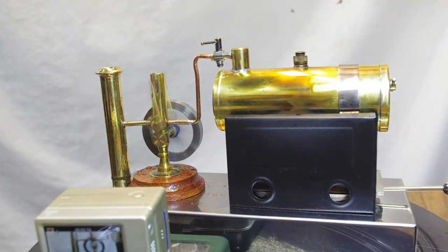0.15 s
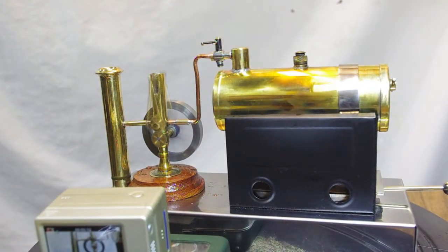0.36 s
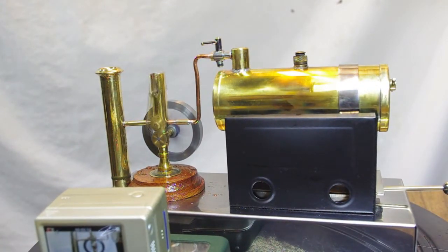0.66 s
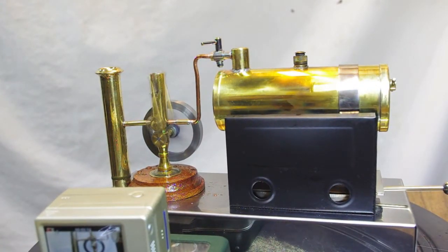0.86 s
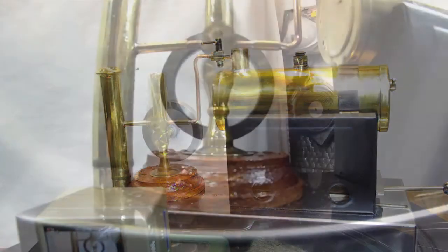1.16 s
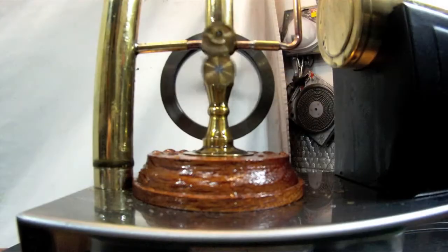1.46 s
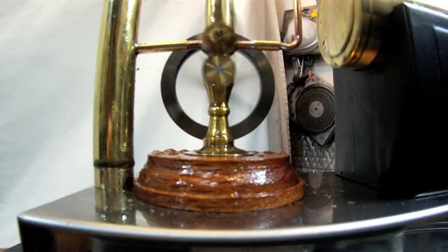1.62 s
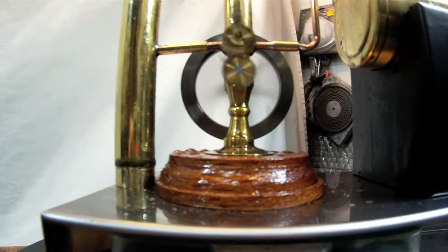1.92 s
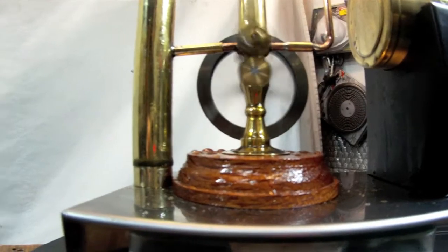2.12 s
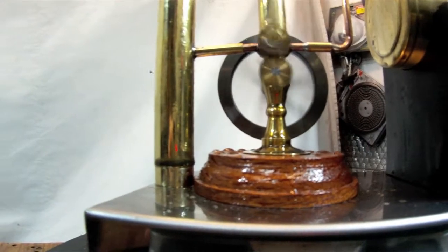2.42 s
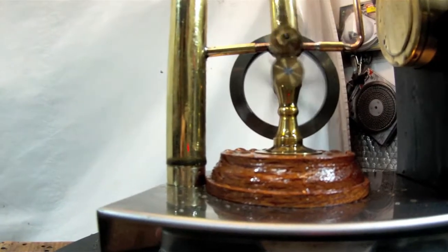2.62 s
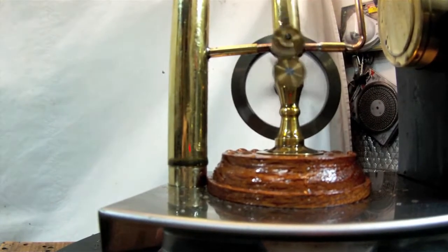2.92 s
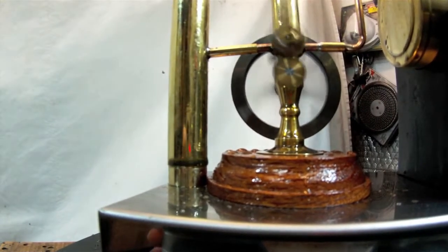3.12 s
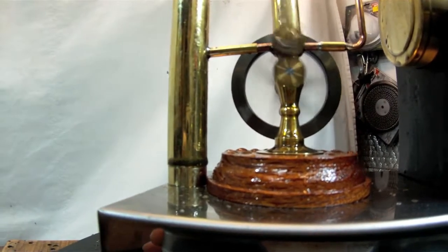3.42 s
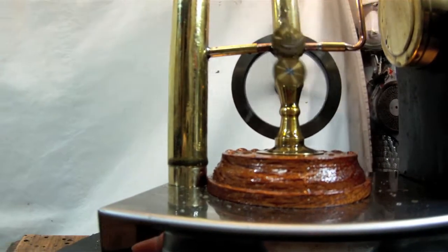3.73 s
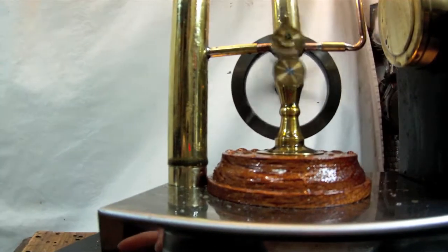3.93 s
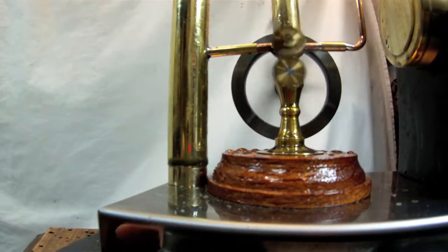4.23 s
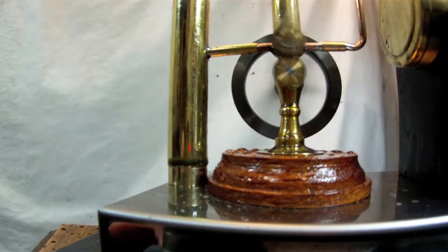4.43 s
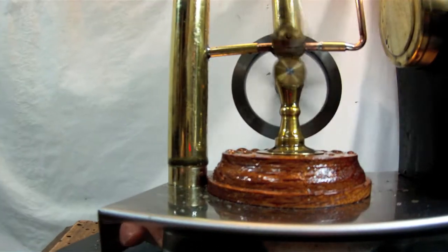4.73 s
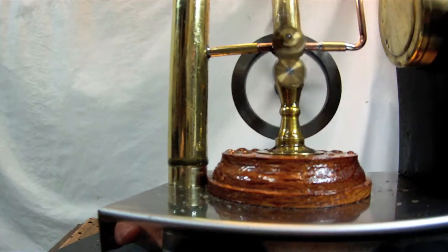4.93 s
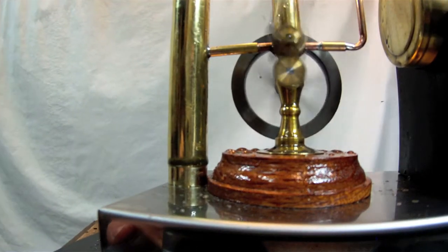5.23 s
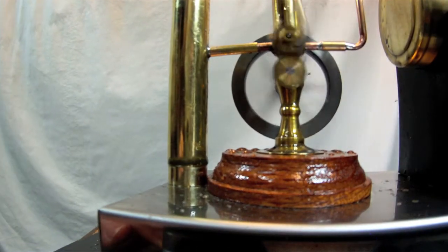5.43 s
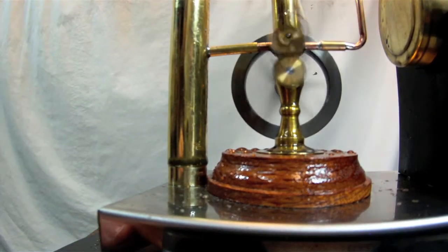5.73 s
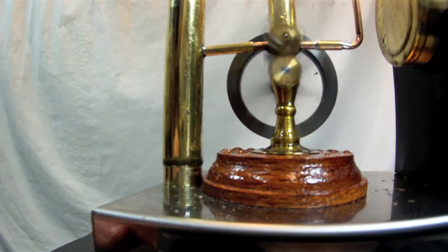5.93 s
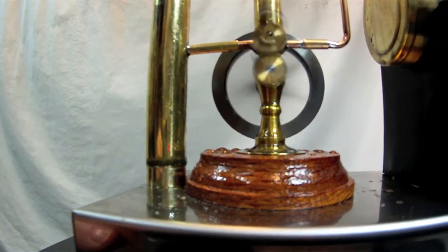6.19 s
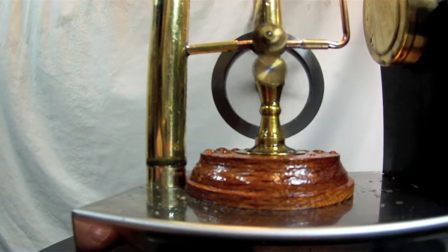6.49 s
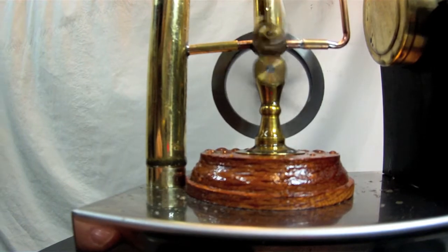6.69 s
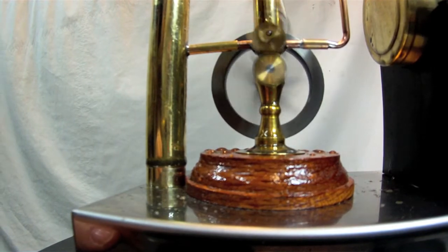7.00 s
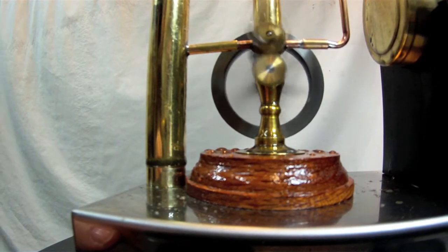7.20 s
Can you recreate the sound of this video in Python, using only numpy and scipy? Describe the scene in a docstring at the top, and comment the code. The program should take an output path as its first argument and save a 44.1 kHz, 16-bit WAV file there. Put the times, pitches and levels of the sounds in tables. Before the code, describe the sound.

A toy-sized steam engine is already running at 0 s and never stops, making nearly thirteen even chuffs a second, a fast fluttering purr. Until about 1 s it is heard across the bench: little bass, bright sputtering steam, crisp crank ticks, a short falling hoot on each puff and a second small spurt between. From 1 to 1.5 s this crossfades into a close hand-held view, fuller and hollower, with midrange chuffs, gentler wet hiss, light brass knocks and a thin port whistle. Soft steady noise and low handling rumble lie underneath, with dull bumps near 1.7 and 6.1 s. Speed crests very slightly around 3 s, then eases along with the level. From about 3.7 to 6 s the microphone moves round the engine: the whistle fades, resonances slide mostly upward, and the chuff grows shorter and more boxy while narrow cylinder ringing strengthens. The beat continues to the end, past 7.25 s.

```python
"""Model steam engine

One oscillating cylinder at about 13 turns/s: each turn a gated noise chuff with a hoot, a steam spit, crank knocks.
Looped and fresh noise rubs at the wet port face and rings the cylinder; steady soft noise lies under the close view.
A far view crossfades into a hand-held close view, which drifts through the resonances round the engine.
Turn-count rules give the pulse times; noise and tones under their envelopes are coloured by resonances."""
import sys
import numpy as np
from scipy import signal
from scipy.fft import rfft, irfft, next_fast_len
from scipy.io import wavfile
from scipy.ndimage import uniform_filter1d, map_coordinates

SR = 44100
rng = np.random.default_rng(int(sys.argv[2]) if len(sys.argv) > 2 else 0)


def wav_record(signal):
    """Record a signal, one row per channel, as 16-bit PCM in the file named by sys.argv[1]."""
    frames = np.transpose(np.atleast_2d(signal))
    bounded = np.clip(frames, -1, 1)
    # unit amplitude maps onto the largest positive 16-bit level
    quanta = np.round(bounded * 32767).astype(np.int16)
    wavfile.write(sys.argv[1], SR, quanta)


N = 324260


def amp(db):
    """Decibels to linear gain."""
    return 10 ** (np.asarray(db) / 20)


def unit(x):
    """x scaled to an rms of 1."""
    return x / np.sqrt(np.mean(x ** 2) + 1e-20)


def noise():
    """Fresh white noise."""
    return rng.standard_normal(N)


def curve(rows):
    """(t/s, value) rows interpolated to one value per sample."""
    return np.interp(np.arange(N) / SR, *np.transpose(rows))


def along(points, hz):
    """(f/Hz, value) points interpolated on a log axis."""
    f, v = np.transpose(points)
    return np.interp(np.log(hz + 1), np.log(f + 1), v)


def slope(points):
    """Gain over frequency of a (f/Hz, level/dB) spectrum."""
    return lambda hz: amp(along(points, hz))


def resonant(modes):
    """Gain over frequency of steep resonances, powers summed; each is 6 dB down at centre +/- width."""
    def gain(hz):
        power = sum(amp(db) ** 2 / (1 + ((hz - centre) / width) ** 2) ** 2
                    for centre, width, db in modes)
        return np.sqrt(power)
    return gain


def coloured(x, gain):
    """x through the minimum-phase filter with this gain over frequency."""
    size = next_fast_len(N + SR // 4, True) // 2 * 2
    log_gain = np.log(np.maximum(gain(np.fft.rfftfreq(size, 1 / SR)), 1e-6))
    cepstrum = irfft(log_gain, size)
    # folding the cepstrum makes the filter causal
    cepstrum[1:size // 2] *= 2
    cepstrum[size // 2 + 1:] = 0
    return irfft(rfft(x, size) * np.exp(rfft(cepstrum)), size)[:N]


def filtered(x, gain):
    """x with its spectrum multiplied by gain(hz); a real gain adds no delay."""
    size = next_fast_len(N + SR // 4, True)
    return irfft(rfft(x, size) * gain(np.fft.rfftfreq(size, 1 / SR)), size)[..., :N]


def moving_band(x, hz, width_hz):
    """x through a resonance with a moving centre: shift to 0 Hz, low-pass, shift back."""
    turn = np.exp(2j * np.pi * np.cumsum(hz) / SR)
    pole = np.exp(-np.pi * width_hz / SR)
    return 2 * np.real(turn * signal.lfilter([1 - pole], [1, -pole], x / turn))


def wobble(rate_hz):
    """Smooth random curve with rate_hz knots a second."""
    knots = rng.standard_normal(int(N * rate_hz / SR) + 4)
    return map_coordinates(knots, [np.arange(N) * rate_hz / SR])


def pulses(times, sizes, response):
    """The response, started at each time and scaled by its size."""
    index = np.clip(np.round(times * SR).astype(int) + SR, 0, None)
    return signal.fftconvolve(np.bincount(index, sizes, N + SR), response)[SR:SR + N]


def swell(rise, t60):
    """Envelope of one blow: builds up, then decays exponentially (s)."""
    t = np.arange(SR // 4) / SR
    return (1 - np.exp(-(t / rise) ** 2)) * amp(-60 * t / t60)


def stroke(rise, t60, length, shut_s=0.0064, tail_db=-5):
    """Envelope of one exhaust stroke: pressure builds and sinks; port shuts, leaving a tail of reflections."""
    t = np.arange(SR // 4) / SR
    shut = (1 + np.tanh((t - length) / shut_s)) / 2
    return swell(rise, t60) * amp(tail_db * shut)


def echoes(envelope, band, count=8):
    """Dense reflections: noise forced in turn to the band's spectrum and to the envelope."""
    x = envelope * rng.standard_normal(len(envelope))
    gain = band(np.fft.rfftfreq(len(x), 1 / SR))
    wanted = np.abs(uniform_filter1d(envelope ** 2, size=500))
    for _ in range(count):
        x = irfft(gain * np.exp(1j * np.angle(rfft(x))), len(x))
        x *= np.sqrt(wanted / (np.abs(uniform_filter1d(x ** 2, size=500)) + 1e-14))
    return x * np.sqrt(np.mean(gain ** 2) / np.sum(x ** 2))


def gated(times, sizes, envelope):
    """Fresh noise under the envelope of every blow."""
    power = np.abs(pulses(times, sizes ** 2, envelope ** 2))
    return unit(noise() * np.sqrt(power))


def scraped(times, sizes, envelope, repeats):
    """Noise each turn: part retraces the same marks in the metal, the rest is new."""
    share = lambda hz: np.clip(along(repeats, hz), 0, 1)
    marks = unit(pulses(times, sizes, echoes(envelope, np.ones_like)))
    same = filtered(marks, lambda hz: np.sqrt(share(hz)))
    fresh = filtered(gated(times, sizes, envelope), lambda hz: np.sqrt(1 - share(hz)))
    return same + fresh


def chirps(times, sizes, hz, envelope):
    """One gliding tone per turn; hz(t) is its pitch."""
    t = np.arange(len(envelope)) / SR
    tone = np.sin(2 * np.pi * np.cumsum(hz(t)) / SR)
    return unit(pulses(times, sizes, envelope * tone))


def steady_turns(t, speed_hz=12.751, dead_centre_s=0.0679):
    """Far view: turns made at constant speed."""
    return speed_hz * (t - dead_centre_s)


def cresting_turns(t, peak_s=3.0166, peak_hz=13.03, change_hz_per_s=0.1122):
    """Close view: turns made while speed climbs evenly to a peak, then falls evenly."""
    since = t - peak_s
    return since * (peak_hz - change_hz_per_s * np.abs(since) / 2)


def strokes(turns, port_lead_s=0.006, scatter_db=-0.65):
    """One exhaust per whole turn, opening before dead centre, sizes scattered: (times, sizes)."""
    t = np.linspace(-.1, N / SR + .1, 1000)
    made = turns(t)
    whole = np.arange(np.ceil(made[0]), made[-1])
    times = np.interp(whole, made, t) - port_lead_s
    return times, amp(scatter_db * rng.standard_normal(len(times)))


# chuff at far, near, beside, behind: level/dB, rise/s, t60/s, bark rise/s, bark t60/s,
# port open/s, lead on the steam/s, bass/dB re body
CHUFF_ROWS = [(-27.5, 0.0026, 0.28, 0.0012, 0.97, 0.061, -0.003, 2.5),
              (-25, 0.0057, 0.32, 0.0057, 0.38, 0.057, .005, 1),
              (-26.5, 0.0095, 0.363, 0.019, 0.45, 0.053, .004, 0.5),
              (-25, 0.012, 0.24, 0.028, 0.38, 0.044, .005, -1.5)]
# turbulence, new at every turn: f/Hz, power share 0-1
TURBULENCE_SHARE = [(150, 0), (600, 0.07), (1100, 0.14), (1800, 0.01), (2600, 0.34), (4000, 0.39)]


def chuff(times, sizes, modes, db, rise, t60, bark_rise, bark_t60, length, lead, boom_db,
          boom_hz=440, bark_hz=800, boom_t60=0.53):
    """One pressure pulse repeated every turn plus fresh turbulence rings the resonances; the port gates all but the bass."""
    above = lambda hz, edge: hz ** 12 / (hz ** 12 + edge ** 12)
    share = lambda hz: np.clip(along(TURBULENCE_SHARE, hz), 0, 1)
    boom_band = lambda hz: np.sqrt(1 - above(hz, boom_hz))
    body_band = lambda hz: np.sqrt(np.abs(above(hz, boom_hz) - above(hz, bark_hz)))
    bark_band = lambda hz: np.sqrt(above(hz, bark_hz))
    boom = amp(boom_db) * echoes(swell(0.012, boom_t60), boom_band)
    body = echoes(stroke(rise, t60, length), body_band)
    # from the side the bark builds late, by way of the firebox wall
    bark_envelope = stroke(bark_rise, bark_t60, length)
    bark = echoes(bark_envelope, bark_band)
    repeated = unit(pulses(times - lead, sizes, boom + body + bark))
    pulse = filtered(repeated, lambda hz: np.sqrt(1 - share(hz)))
    rush = filtered(gated(times - lead, sizes, bark_envelope), lambda hz: np.sqrt(share(hz)))
    return amp(db) * unit(coloured(pulse + rush, resonant(modes)))


# resonances between engine and firebox: t/s, lower f/Hz, its gain (linear, signed), upper f/Hz, its gain
GLIDE_ROWS = [(3.8, 700, 0.19, 1020, -0.49), (4.4, 730, 0.74, 1030, -0.88), (4.9, 774, 0.61, 1060, 0.48),
              (5.2, 800, 0.38, 1170, 0.33), (5.7, 795, 0, 1160, -0.5)]


def passing(x):
    """Two resonances drift, mostly upwards, as the microphone moves round the engine."""
    rows = np.array(GLIDE_ROWS)
    low_hz, low_gain, high_hz, high_gain = (curve(rows[:, [0, k]]) for k in range(1, 5))
    low = low_gain * moving_band(x, low_hz, width_hz=42)
    high = high_gain * moving_band(x, high_hz, width_hz=79)
    return x + low + high


# exhaust pipe at far, near, behind: level/dB, final f/Hz, start above it/Hz, fall/s, t60/s, delay/s
HOOT_ROWS = [(-30, 497, 214, 0.01014, 0.15, 0.00251), (-27, 476, 303, 0.01092, 0.072, 0.00072),
             (-29, 548, 126.3, 0.0079, 0.064, 0.00502)]
# reflections at the same places, one list each: delay/s, level/dB re direct
HOOT_WALLS = [
    [(.01968, -4.5), (.02773, -6), (.05035, -6)],
    [(.01716, -0.5), (.03152, -1.5), (.04807, -9)],
    [(.0285, -10)],
]


def hoot(times, sizes, db, hz, drop_hz, fall, t60, delay, walls, rise=.002):
    """Pipe tone at each chuff, falling as the pressure is spent; discrete reflections follow."""
    pitch = lambda t: hz + drop_hz * np.exp(-t / fall)
    tone = chirps(times + delay, sizes, pitch, stroke(rise, t60, 0.095))
    reflect = lambda f: 1 + sum(amp(loss) * np.exp(-2j * np.pi * f * late) for late, loss in walls)
    return amp(db) * unit(filtered(tone, reflect))


def pop(times, sizes, db=-39.5, hz=600, drop_hz=900, fall_s=.003):
    """Dry falling chirp as the port cracks open."""
    pitch = lambda t: hz + drop_hz * np.exp(-t / fall_s)
    return amp(db) * chirps(times + .0065, sizes, pitch, swell(rise=.0006, t60=0.036))


def spray(ragged_db, rate_hz=1100):
    """Wet steam sputters: a random gain flickers as droplets pass."""
    return unit(amp(ragged_db * wobble(rate_hz)))


# play in crank pin and pivot: t/s after the exhaust opens, far level/dB, close level/dB (both relative)
KNOCK_ROWS = [(.0045, -15, -1.5), (.0087, 1.5, 4), (0.0126, 0, -1.5), (.018, -7, -5.5), (0.022, -7, -5.5),
              (.028, -8, -7.5), (.049, -9, -10)]


def knocks(times, column, t60, jitter_s=.0002):
    """The crank takes up its play at nearly fixed delays each turn, never equally hard."""
    rows = np.array(KNOCK_ROWS)
    delay, db = rows[:, 0], rows[:, column]
    when = times[:, None] + delay + jitter_s * rng.standard_normal((len(times), len(delay)))
    sizes = amp(db + rng.uniform(-2, 2, when.shape))
    click = swell(.00005, t60) * rng.standard_normal(SR // 4)
    return unit(pulses(when.ravel(), sizes.ravel(), click))


def inlet_whistle(times, sizes, hz=1690, drop_hz=170, fill_s=0.0414, db=-37.0):
    """The inlet whistles, its pitch sinking as the cylinder fills."""
    pitch = lambda t: hz - drop_hz * np.minimum(t / fill_s, 1) ** 4
    return amp(db) * chirps(times + .041, sizes, pitch, stroke(.012, 0.21, fill_s))


def rubbing(times, repeats):
    """The cylinder slides on its wet port face without pause; each turn fades into the next."""
    period = np.mean(np.diff(times))
    envelope = np.sin(np.linspace(0, np.pi, int(2 * period * SR)))
    starts = np.r_[times[0] - period, times] - period / 2
    return scraped(starts, np.ones(len(starts)), envelope, repeats)


def leak_dip(times, depth, lead=0.0167, length=0.0051):
    """Gain of the leaks: a brief dip each turn shortly before the exhaust opens."""
    t = np.arange(SR // 16) / SR
    dip = np.sin(np.pi * np.minimum(t / length, 1)) ** 2
    return 1 - np.clip(depth, 0, 1) * pulses(times - lead - length / 2, np.ones(len(times)), dip)


# part of hiss and scrape that is the same every turn, close: f/Hz, power share 0-1
CLOSE_REPEATS = [(1700, .86), (2500, .68), (4000, .55), (8000, .55), (10000, .68)]
# cylinder bands: f/Hz, width/Hz, level/dB (relative)
CYLINDER_MODES = [(1588, 100, 0.5), (1680, 93, -1.5)]


def singing(times, db):
    """The rubbing keeps the cylinder ringing in narrow bands."""
    return amp(db) * unit(coloured(rubbing(times, CLOSE_REPEATS), resonant(CYLINDER_MODES)))


def bench(x, wet_db, t60):
    """Boiler, firebox and plate throw back short reflections that comb the hiss."""
    tail = swell(0.00052, t60) * rng.standard_normal(SR // 4)
    tail /= np.linalg.norm(tail)
    return unit(x + amp(wet_db) * signal.fftconvolve(x, tail)[:N])


def thump(times, sizes, hz, delay, length):
    """The rocking cylinder pushes the bench once a turn: a short tone burst."""
    t = np.arange(-SR // 16, SR // 16) / SR
    push = np.sin(2 * np.pi * hz * t) * np.exp(-(t / length) ** 2)
    return unit(pulses(times + delay + t[0], sizes, push))


# exhaust pipe, firebox and bench from afar: f/Hz, width/Hz, level/dB (relative)
FAR_MODES = [(258, 10, -19.5), (320.4, 8.6, -10.5), (499, 12, -2.5), (556, 86, -5), (696, 37, -8),
             (876, 140, -12), (980, 120, -16), (1330, 150, -16), (1655, 58, -10), (2460, 370, -17)]
# part of hiss and scrape that is the same every turn: f/Hz, power share 0-1
FAR_REPEATS = [(1700, .88), (2500, .68), (4000, .52), (8000, .25)]
# filter gains for spit with ticks, and for leak: f/Hz, level/dB (relative)
FAR_SPIT = [(1180, -42), (2000, -6), (2520, -8.5), (3040, -9), (3870, -2.5), (5500, -4.5), (6140, 1),
            (8220, -6.5), (12700, -15), (14600, -36), (15500, -99)]
FAR_LEAK = [(700, -12), (1500, 2.5), (1900, -8.5), (2400, -1), (2950, -6), (3900, -4.5), (6000, -5.5),
            (8240, -1), (10500, -13), (13200, -22), (14500, -45), (15500, -59)]


def far_view(times, sizes, low_hz=150, ring_db=-39.5):
    """Across the bench: thin bass, bright steam, sharp ticks, a second spurt as the inlet opens."""
    steam = scraped(times, sizes, swell(rise=0.0094, t60=0.23), FAR_REPEATS)
    spit = amp(-26.5) * bench(steam * spray(ragged_db=4), wet_db=2, t60=0.051)
    ticks = amp(-27.0) * knocks(times, column=1, t60=0.012)
    treble = amp(-26.5) * unit(coloured(spit + ticks, slope(FAR_SPIT)))
    inlet = gated(times + 0.052, sizes, swell(rise=0.0074, t60=0.11))
    hiss = bench(amp(-3.0) * inlet + rubbing(times, FAR_REPEATS), wet_db=1.0, t60=0.12)
    hiss = hiss * leak_dip(times, depth=0.31, lead=0.0011, length=0.0086)
    leak = amp(-26.0) * unit(coloured(hiss * spray(ragged_db=1.0), slope(FAR_LEAK)))
    tones = pop(times, sizes) + hoot(times, sizes, *HOOT_ROWS[0], HOOT_WALLS[0])
    tones = tones + inlet_whistle(times, sizes) + singing(times, ring_db)
    engine = chuff(times, sizes, FAR_MODES, *CHUFF_ROWS[0]) + treble + leak + tones
    thinned = filtered(engine, lambda hz: hz ** 4 / (hz ** 4 + low_hz ** 4))
    return thinned + amp(-57) * thump(times, sizes, hz=161.0, delay=0.0063, length=0.014)


# exhaust pipe, firebox and bench from three close places: f/Hz, width/Hz, level/dB (relative)
NEAR_MODES = [(246, 32, -17), (358, 39, -12), (547, 20, -3), (640, 18, -8), (704, 33, 0), (826, 47, -13),
              (919, 23, -14), (1080, 125, -14), (1342, 34, -9.5), (1530, 210, -17), (1910, 110, -23.5),
              (2363, 75, -10.5), (2590, 420, -17)]
BESIDE_MODES = [(251, 14.5, -10.5), (369, 92, -9.5), (506.4, 17.4, 2), (576, 21, -4), (756, 124, -3.5),
                (905, 75, -5.5), (1050, 63, -1.1), (1185, 34, -3.5), (1340, 50, -1), (1790, 290, -11),
                (2465, 140, -5.5), (2600, 410, -19.5)]
BEHIND_MODES = [(252, 50, -24), (330, 81, -21), (502.5, 15, -8), (563.2, 25, -3.5), (788, 13.5, -7.5),
                (909, 24, -7.5), (980, 47, -14.5), (1188, 56, -4), (1361, 30, -8.5), (1580, 130, -19),
                (1690, 35, -8.5), (2330, 310, -19)]
# steam at near, beside, behind: level/dB (relative), rise/s, t60/s, port open/s
SPIT_ROWS = [(-30.5, 0.011, 0.11, 0.061), (-31.5, 0.0063, 0.17, 0.037), (-30, 0.0063, 0.247, 0.054)]
# filter gains for spit with ticks, and for leak: f/Hz, level/dB (relative)
CLOSE_SPIT = [(1400, -22), (2500, -4.5), (2950, -9), (3700, -10), (4550, -13.5), (5300, -15), (6000, -23.5),
              (7600, -12), (9400, -13.5), (10500, -20), (11500, -19), (12500, -21.5), (14200, -17.5),
              (15500, -19)]
CLOSE_LEAK = [(1760, -20), (3000, -4.5), (3390, -11), (3710, -8.5), (4440, -12.5), (6010, -21),
              (7430, -17.5), (8180, -16.5), (11100, -17), (11800, -26), (12000, -24), (12400, -25),
              (13200, -17), (14800, -19), (15500, -40)]
# brass frame under the knocks, and port-face whistle: f/Hz, width/Hz, level/dB (relative)
FRAME_MODES = [(3860, 170, 3.5), (4370, 520, -2.5)]
WHISTLE_MODES = [(2394, 29, -1), (9610, 140, -17), (14450, 190, -22)]


def close_view(times, sizes, place, ring_near_db=-40, ring_db_per_place=3):
    """Beside the flywheel: a fuller chuff, its colour crossfaded by the microphone's place."""
    weights = [np.sqrt(np.clip(1 - np.abs(place - k), 0, 1)) for k in range(3)]
    places = zip(weights, (NEAR_MODES, BESIDE_MODES, BEHIND_MODES), CHUFF_ROWS[1:])
    beat = passing(sum(w * chuff(times, sizes, modes, *row) for w, modes, row in places))
    near_hoot = weights[0] * hoot(times, sizes, *HOOT_ROWS[1], HOOT_WALLS[1])
    behind_hoot = weights[2] * hoot(times, sizes, *HOOT_ROWS[2], HOOT_WALLS[2], rise=0.02)
    spit = sum(w * amp(db) * scraped(times - .002, sizes, stroke(*shape), CLOSE_REPEATS)
               for w, (db, *shape) in zip(weights, SPIT_ROWS))
    # knocks click and ring the brass frame
    rattle = knocks(times, column=2, t60=0.0051)
    ticks = amp(-38.0) * rattle + amp(-38.5) * unit(coloured(rattle, resonant(FRAME_MODES)))
    treble = amp(-30.5) * unit(coloured(spit * spray(ragged_db=1.5) + ticks, slope(CLOSE_SPIT)))
    leak = amp(-35.0) * unit(coloured(rubbing(times, CLOSE_REPEATS), slope(CLOSE_LEAK)))
    # each place has its own reflections
    steam = amp(-31.5) * sum(w * bench(treble + leak, wet_db=-2.5, t60=0.046) for w in weights)
    # port-face whistle, strongest at the near place
    jet = scraped(times, sizes, swell(rise=0.0092, t60=0.29), CLOSE_REPEATS)
    jet = jet + amp(-1.5) * rubbing(times, CLOSE_REPEATS)
    whistle = amp(-29.5) * weights[0] ** 3 * unit(coloured(jet, resonant(WHISTLE_MODES)))
    ring = singing(times, ring_near_db + ring_db_per_place * place)
    # the bench is heard more away from the front
    push = thump(times, sizes, hz=120.0, delay=0.0234, length=0.015)
    push = amp(-51.5) * np.minimum(place, 1) * push
    dipped = leak_dip(times, depth=0.3) * (steam + whistle)
    return beat + near_hoot + behind_hoot + ring + push + dipped


def reflection_notches(x, notch_hz=6050, width_hz=700, octave_hz=12030, octave_width_hz=300,
                       notch_db=-9, octave_db=-32):
    """A short reflection at the microphone weakens one band and its octave."""
    dip = lambda hz, centre, width: np.exp(-((hz - centre) / width) ** 2)
    gain = lambda hz: amp(notch_db * dip(hz, notch_hz, width_hz)
                          + octave_db * dip(hz, octave_hz, octave_width_hz))
    return filtered(x, gain)


# steady noise bands: f/Hz, width/Hz, level/dB (relative)
BED_MODES = [(138, 22, 1.5), (280, 55, -3), (715, 91, 11.5)]


def steady_bed(db=-45):
    """Steady soft noise, strongest near 715 Hz, under the close view."""
    return amp(db) * unit(coloured(noise(), resonant(BED_MODES)))


# handling bumps: t/s, level/dB
BUMP_ROWS = [(1.714, -36), (6.1, -37)]
# handling rumble filter gain: f/Hz, level/dB (relative)
RUMBLE_SPECTRUM = [(12, -38), (20, -4), (48, 5.5), (129, 9), (180, -5), (230, -44), (400, -120)]


def handling(grip_db=-54.5, sway_db=2.5, hum_hz=64, hum_db=-55):
    """Hand-held pickup: uneven noise rumble, wavering low hum, two soft bumps."""
    bump_s, bump_db = np.transpose(BUMP_ROWS)
    level_db = grip_db + sway_db * wobble(1.1) + 0.73 * wobble(6.6)
    rumble = amp(level_db) * unit(coloured(noise(), slope(RUMBLE_SPECTRUM)))
    hum = amp(hum_db + 1.5 * wobble(2.66)) * np.sin(2 * np.pi * hum_hz * np.arange(N) / SR)
    thud = unit(coloured(noise(), resonant([(130, 100, 0)])))
    bumps = thud * pulses(bump_s - .01, amp(bump_db), swell(rise=0.0019, t60=0.13))
    return rumble + hum + bumps


# crossfade: t/s, close share 0-1
CLOSE_SHARE = [(1.0, 0.04), (1.5, 0.99)]
# microphone drift: t/s, place (0 near, 1 beside, 2 behind)
PLACE_ROWS = [(3.7, 0.29), (4.4, 0.58), (4.85, 1.04), (5.3, 1.23), (5.7, 1.56), (6.1, 1.72)]


def scene(far_db=-0.5, peak_db=0.87, peak_s=3.0166, sag_db_per_s=0.14):
    """Far and close views, each with its own beat, crossfade; the close beat sags as the boiler loses pressure."""
    close = np.clip(curve(CLOSE_SHARE), 0, 1)
    place = np.clip(curve(PLACE_ROWS), 0, 2)
    effort_db = peak_db - sag_db_per_s * (np.arange(N) / SR - peak_s)
    far = amp(far_db) * far_view(*strokes(steady_turns))
    near = amp(effort_db) * reflection_notches(close_view(*strokes(cresting_turns), place))
    return ((1 - close) * far + close * (near + handling() + steady_bed()))[None]


def record(dry, top_hz=15600):
    """Nothing passes from top_hz upwards."""
    return filtered(dry, lambda hz: hz < top_hz)


dry = scene()
out = record(dry)
wav_record(out)
```